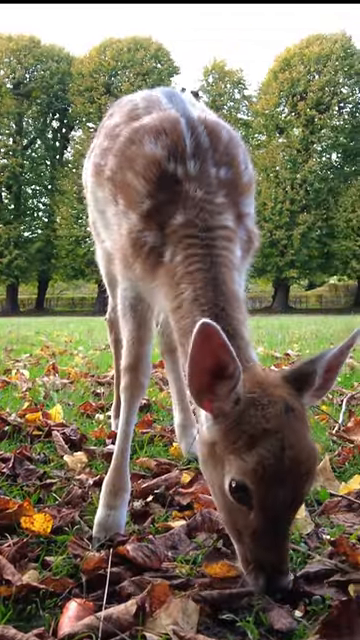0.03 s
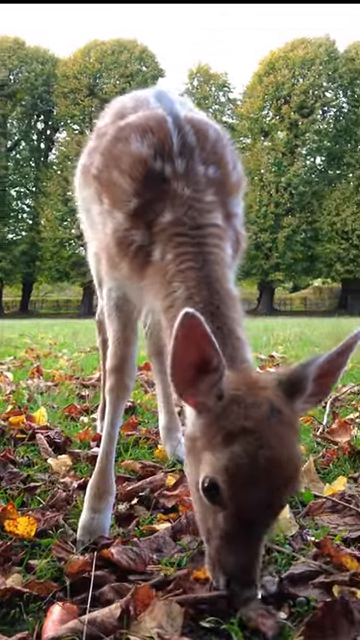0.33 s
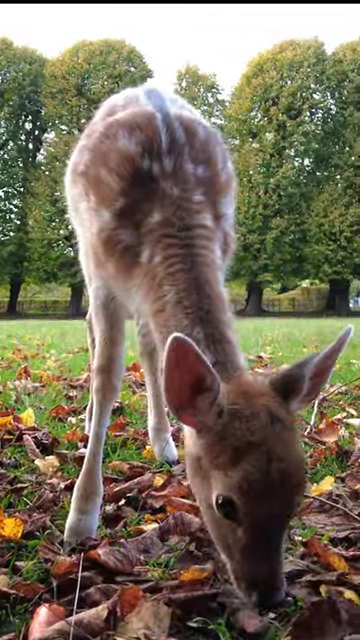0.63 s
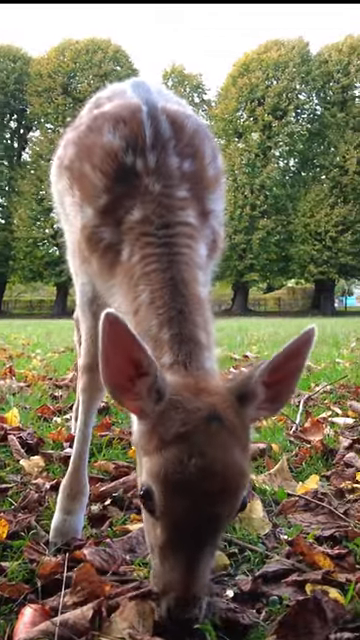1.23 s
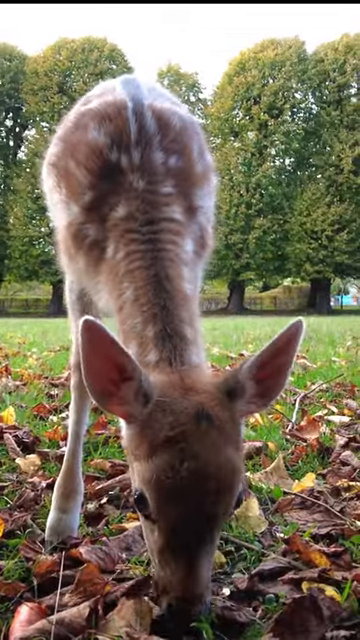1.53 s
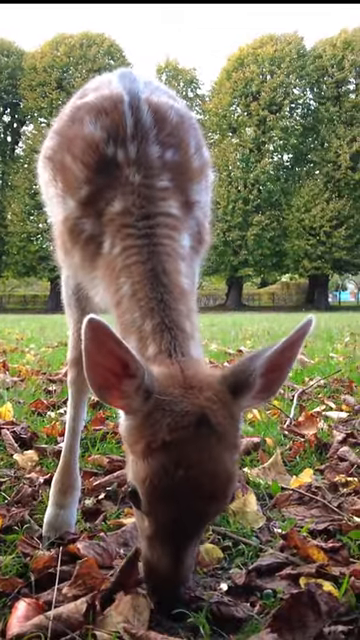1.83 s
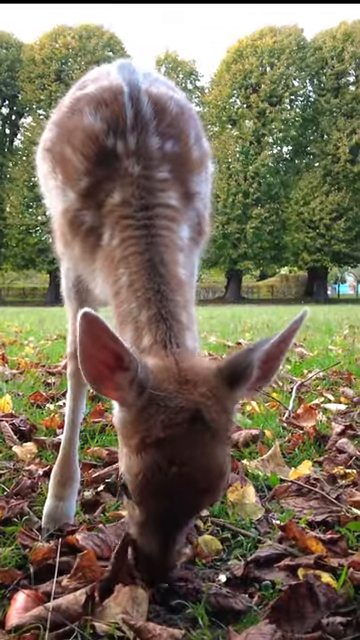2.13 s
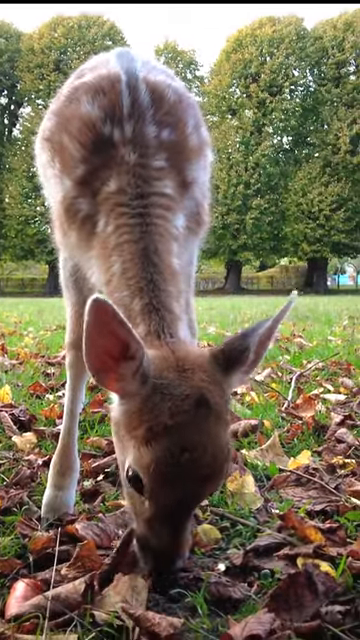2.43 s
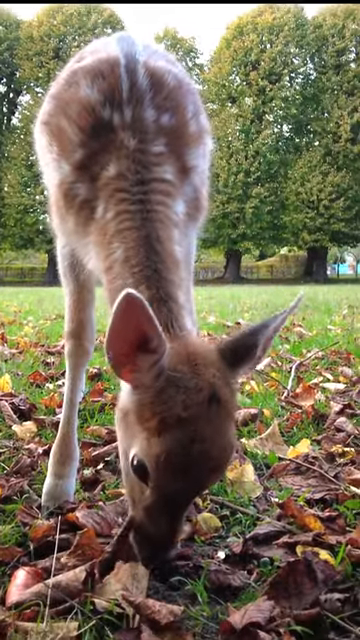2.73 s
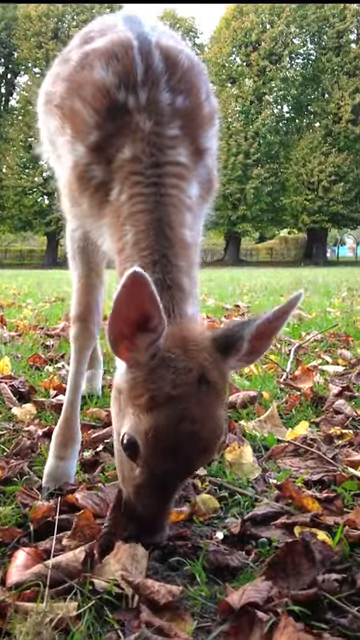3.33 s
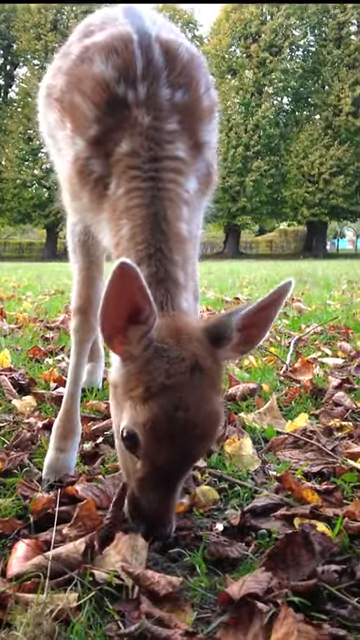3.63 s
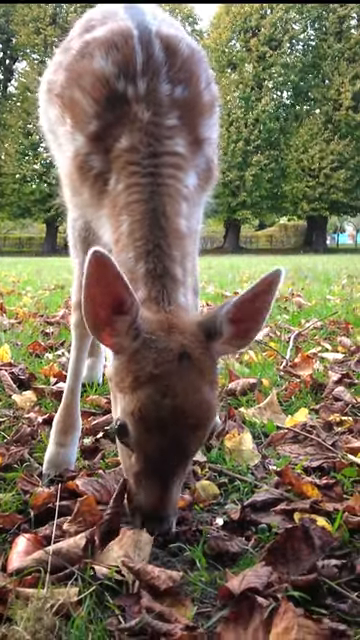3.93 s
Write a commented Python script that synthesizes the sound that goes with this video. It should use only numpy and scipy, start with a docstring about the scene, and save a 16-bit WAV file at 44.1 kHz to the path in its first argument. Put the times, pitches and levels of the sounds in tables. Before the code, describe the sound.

Low wind rumbles and thumps on the microphone in a park, then eases into a distant traffic drone and soft hiss. Close by, a feeding deer makes faint leaf ticks, rustles and a few small crunches.

```python
"""In a park, a young deer noses through fallen leaves close to the microphone.
Dry leaves tick and rustle, a few bites crunch, and grass swishes along its muzzle.
A gust rumbles and slaps on the microphone in the first two seconds.
Behind it lie the low drone of distant traffic, a soft midrange rush and an even airy hiss.
Nearly every sound is noise, given a tone colour and then made louder and softer over time."""
import sys
import numpy as np
from scipy import signal
from scipy.fft import rfft, irfft, next_fast_len
from scipy.io import wavfile
from scipy.ndimage import uniform_filter1d, map_coordinates

SR = 44100
rng = np.random.default_rng(int(sys.argv[2]) if len(sys.argv) > 2 else 0)


def inscribe(sig):
    """Save sig as 16-bit PCM at rate SR to the path in sys.argv[1].

    A 1-D sig is mono; a 2-D sig holds one channel per row.
    Samples are clipped to [-1, 1] before scaling.
    """
    pcm = np.round(np.clip(np.atleast_2d(sig).T, -1, 1) * 32767)
    wavfile.write(sys.argv[1], SR, pcm.astype(np.int16))


N = 176400  # 4 seconds


def amp(db):
    """Turn decibels into a number to multiply by."""
    return 10 ** (np.asarray(db) / 20)


def unit(x):
    """Scale a signal to an average strength (rms) of 1."""
    return x / np.sqrt(np.mean(x ** 2) + 1e-20)


def clock():
    """The time of each sample, in seconds."""
    return np.arange(N) / SR


def along(points, hz):
    """Read between (f/Hz, value) points on a log frequency scale."""
    f, v = np.transpose(points)
    return np.interp(np.log(hz + 1), np.log(f + 1), v)


def level(rows):
    """A volume curve through (t/s, level/dB) points."""
    return amp(np.interp(clock(), *np.transpose(rows)))


def swells(rows):
    """Bell-shaped swells from (t/s, width/s, level/dB) rows."""
    bells = (amp(db) * np.exp(-.5 * ((clock() - s) / width) ** 2) for s, width, db in rows)
    return np.sqrt(sum(bell ** 2 for bell in bells))


def burst(s, rise, decay):
    """A volume curve that rises to a peak at time s and dies away; all in seconds."""
    t = clock() - s
    return np.exp(np.minimum(t / rise, -t / decay))


def wobble(per_s):
    """A smooth curve through per_s random values a second."""
    return map_coordinates(rng.standard_normal(400), [clock() * per_s], mode="wrap")


def filtered(x, response):
    """Turn each frequency of x up or down by response(hz)."""
    size = next_fast_len(N + 8192)
    hz = np.fft.rfftfreq(size, 1 / SR)
    return irfft(rfft(x, size) * response(hz), size)[..., :N]


def white():
    """Two unrelated white noises."""
    return rng.standard_normal((2, N))


def patchy(depth_db):
    """Two white noises that grow louder and softer in patches of time and pitch."""
    spectra = signal.stft(white(), nperseg=2048)[2]
    patches = rng.standard_normal(spectra.shape[1:])
    for axis in (0, 1):
        patches = uniform_filter1d(patches, size=7, axis=axis)
    return signal.istft(spectra * amp(depth_db * unit(patches)), nperseg=2048)[1][:, :N]


def shaped(pair, colour, alike):
    """Give two noises a tone colour and a left-right likeness (1 same, 0 unrelated, -1 opposite)."""
    def response(hz):
        angle = np.arccos(np.clip(along(alike, hz), -1, 1)) / 2
        return amp(along(colour, hz)) * [np.cos(angle), np.sin(angle)]
    mid, side = filtered(pair, response)
    return unit(np.array([mid + side, mid - side]))


def steadied(x, span_s):
    """Even out the slow chance swings of a low noise."""
    power = uniform_filter1d(np.mean(x ** 2, axis=0), int(span_s * SR))
    return x / np.sqrt(np.abs(uniform_filter1d(power, int(SR / 20))) + 1e-9)


# how alike left and right are for all the deer's sounds (f/Hz, likeness)
NEAR_ALIKE = [(1500, 0.4), (5000, 0.19)]

def ringing(hz, width):
    """A broad band of noise around hz; width is a share of that pitch."""
    noise = shaped(white(), [(hz, 0)], NEAR_ALIKE)
    return unit(filtered(noise, lambda f: (1j * f * hz / (hz * hz - f * f + 1j * f * hz * width)) ** 2))


# strength of the wind's rumble (t/s, level/dB)
WIND = [(0, -48.5), (.13, -41.5), (.48, -42.5), (.6, -29), (.71, -36), (.82, -28), (1.0, -37.5),
        (1.18, -33.5), (1.35, -33.5), (1.55, -41), (1.75, -38.5), (1.97, -41.5), (2.17, -48), (2.4, -44.5),
        (2.85, -45), (3.02, -52), (3.3, -49.5), (3.42, -42.5), (4, -43.5)]
# swirls of air in the gust (t/s, width/s, level/dB)
SWIRLS = [(.625, .02, -41), (.82, 0.063, -42), (.9, 0.04, -38), (1.19, 0.054, -42), (1.3, 0.021, -39.5),
          (1.36, 0.026, -38.5), (1.49, 0.031, -43), (1.762, 0.021, -43.5)]
# tone colours of the rumble and the swirls (f/Hz, level/dB)
RUMBLE_COLOUR = [(10, -21.5), (25, 1), (45, -2), (85, -4.5), (125, -15.5), (200, -24), (320, -40.5),
                 (600, -76.5)]
SWIRL_COLOUR = [(40, -12), (90, 4.5), (155, 3.5), (240, -7), (340, -18.5), (470, -25), (750, -59)]
# how alike left and right are (f/Hz, likeness)
WIND_ALIKE = [(30, .999), (150, 0.94), (400, 0.44)]

def wind():
    """Moving air rumbles on the microphone; its swirls add lumpy, higher thumping."""
    rumble = steadied(shaped(white(), RUMBLE_COLOUR, WIND_ALIKE), span_s=0.33)
    lumps = shaped(white(), SWIRL_COLOUR, WIND_ALIKE) * amp(0.71 * wobble(44.8))
    return level(WIND) * rumble + swells(SWIRLS) * steadied(lumps, span_s=0.05)


# loudness of the traffic (t/s, level/dB)
TRAFFIC = [(0, -53), (.5, -51.5), (1.6, -50.5), (2.0, -54.5), (2.6, -47), (3.1, -47), (3.45, -49.5),
           (3.7, -47.5), (4, -48)]
# its tone colour (f/Hz, level/dB)
TRAFFIC_COLOUR = [(30, -18), (70, -3), (125, 1.5), (180, -10.5), (260, -16.5), (350, -21), (480, -30.5),
                  (850, -28.5), (1100, -36.5), (2500, -75)]
# how alike left and right are (f/Hz, likeness)
TRAFFIC_ALIKE = [(60, 0.95), (130, 0.96), (270, 0.84), (450, 0.62), (740, -0.35), (1200, 0.013)]

def traffic():
    """Faraway traffic blends into one low drone."""
    return level(TRAFFIC) * shaped(patchy(depth_db=2.4), TRAFFIC_COLOUR, TRAFFIC_ALIKE)


# loudness of the rush (t/s, level/dB)
RUSH = [(0, -68), (.45, -73), (1.05, -71), (1.3, -71.5), (1.72, -68.5), (1.88, -76.5), (2.08, -76),
        (2.28, -69), (2.6, -67.5), (2.9, -69), (3.25, -71.5), (3.65, -71.5), (4, -68)]
# its tone colour (f/Hz, level/dB)
RUSH_COLOUR = [(300, -17), (700, -4), (1000, -22.5), (1190, -3), (1270, 1), (1700, 1.5), (2200, -3.5),
               (2900, -4), (3700, -12), (8000, -42)]
# how alike left and right are (f/Hz, likeness)
RUSH_ALIKE = [(740, 0), (1300, 1), (2000, 0.73), (3300, 1)]

def rush():
    """A soft midrange rush swells and sinks, a little to the left."""
    waver = amp(1.1 * wobble(11))
    noise = shaped(patchy(depth_db=0.5), RUSH_COLOUR, RUSH_ALIKE)
    return level(RUSH) * waver * noise * amp([[.6], [-.6]])


# loudness of the hiss (t/s, level/dB)
HISS = [(0, -61.5), (2.0, -63)]
# its tone colour (f/Hz, level/dB)
HISS_COLOUR = [(300, 1.5), (700, -5.5), (1150, -9.5), (1750, -2), (2250, -4), (2900, 1), (3600, -4),
               (4400, -2.5), (5100, -6.5), (6000, -6), (7100, -11.5), (7800, -9), (8500, -13), (9250, -11),
               (9900, -16.5), (11700, -17.5), (13000, -15.5), (15500, -18)]
# how alike left and right are (f/Hz, likeness)
HISS_ALIKE = [(450, 0.18), (740, -0.74), (1220, 0.24), (2010, 0.46), (3330, -0.075), (5500, -0.05)]

def hiss():
    """An even, airy hiss that barely flickers."""
    flicker = amp(0.33 * wobble(26))
    return level(HISS) * flicker * shaped(patchy(depth_db=1.42), HISS_COLOUR, HISS_ALIKE)


# single leaf snaps (t/s, level/dB, decay/s)
TICKS = [(.163, -59, 0.0022), (.591, -55.5, 0.002), (0.7376, -60.5, .002), (1.038, -56, 0.0055),
         (1.085, -64, 0.0048), (1.6655, -58.5, 0.0027), (1.761, -65, .003), (2.404, -62, .003),
         (3.1618, -59, .003), (3.398, -59, 0.0044), (3.447, -56.5, .004), (3.687, -61, .004)]
# their tone colour (f/Hz, level/dB)
TICK_COLOUR = [(1000, -24), (4000, 6), (7000, 2), (9300, 5.5), (12000, -7), (14000, 3), (15500, -1)]

def ticks():
    """Dry leaves snap with short, bright ticks."""
    snaps = sum(amp(db) * burst(s, 0.002, decay) for s, db, decay in TICKS)
    return snaps * shaped(white(), TICK_COLOUR, NEAR_ALIKE)


# the gust's sharpest puffs (t/s, level/dB, f/Hz)
PUFFS = [(.628, -31.5, 190), (.83, -33, 215), (0.86, -33, 135), (0.896, -29.5, 185), (1.29, -27, 138),
         (1.326, -35.5, 235)]

def puffs(width_cycles=0.33):
    """Each puff slaps the microphone with one quick swing of air pressure."""
    out = np.zeros(N)
    for s, db, hz in PUFFS:
        cycles = (clock() - s) * hz
        bell = np.exp(-.5 * (cycles / width_cycles) ** 2)
        out += amp(db) * bell * np.cos(2 * np.pi * cycles + rng.uniform(0, 2 * np.pi))
    return out


# nudges of the muzzle in the leaves (t/s, level/dB, decay/s)
RUSTLES = [(1.04, -60, 0.035), (1.095, -65, 0.056), (1.16, -67, 0.026), (1.69, -68.5, .1),
           (2.29, -68.5, 0.045), (2.385, -71, .04), (2.85, -68, .02), (3.17, -72, .05),
           (3.397, -67.5, .017), (3.47, -68.5, 0.041), (3.75, -71, 0.073), (3.89, -69, .076)]
# tone colour of the leaves (f/Hz, level/dB)
LEAF_COLOUR = [(600, -6), (2500, -1), (4500, 4.5), (6800, 0), (7800, 2.5), (9300, 2.5), (11700, -2),
               (14500, -5.5)]

def rustles(crackles_per_s=2600, rise_s=0.032, rest_db=-82):
    """Tiny crackles, very faint at rest, swell as the muzzle shifts the leaves."""
    crackles = white() * (rng.random((2, N)) < crackles_per_s / SR)
    nudge_power = sum((amp(db) * burst(s, rise_s, decay)) ** 2 for s, db, decay in RUSTLES)
    loudness = np.sqrt(amp(rest_db) ** 2 + nudge_power)
    return loudness * shaped(crackles, LEAF_COLOUR, NEAR_ALIKE)


# the deer's bites (t/s, level/dB, f/Hz, decay/s)
BITES = [(1.033, -63, 2310, .03), (1.433, -59, 2610, 0.013), (2.381, -60.5, 1580, .012),
         (3.447, -56, 2680, 0.0086)]

def crunches():
    """Each bite is a short burst of noise around one pitch, a little to the right."""
    bites = sum(amp(db) * burst(s, 0.0013, decay) * ringing(hz, width=.45) for s, db, hz, decay in BITES)
    return bites * amp([[-.7], [.7]])


# strokes of the muzzle through grass (t/s, width/s, level/dB, f/Hz)
SWISHES = [(3.17, 0.043, -71, 5300), (3.705, 0.087, -66, 4780), (3.75, 0.065, -70, 14000)]

def swishes(flutter_db=1):
    """Grass blades catch and slip along the muzzle, each stroke at its own pitch."""
    flutter = unit(amp(flutter_db * wobble(130)))
    return flutter * sum(swells([(s, span, db)]) * ringing(hz, width=0.53) for s, span, db, hz in SWISHES)


def scene():
    """The wind, the park and the feeding deer, added together."""
    return wind() + traffic() + rush() + hiss() + ticks() + puffs() + rustles() + crunches() + swishes()


def record(dry, top_hz=15730):
    """Cut away the very highest treble."""
    return filtered(dry, lambda hz: hz < top_hz)


dry = scene()
out = record(dry)
inscribe(out)
```